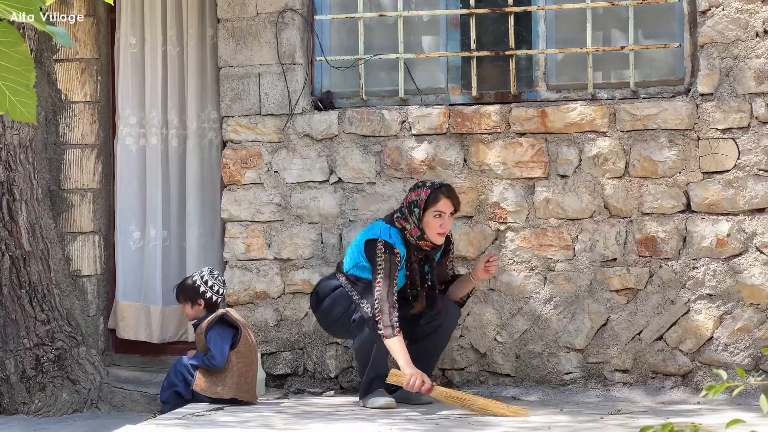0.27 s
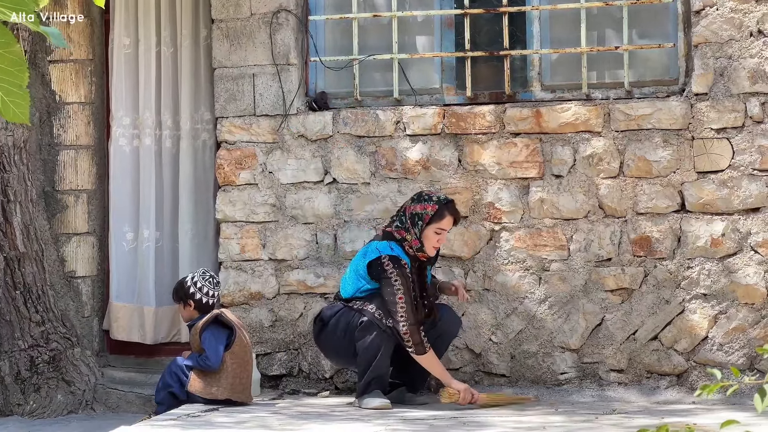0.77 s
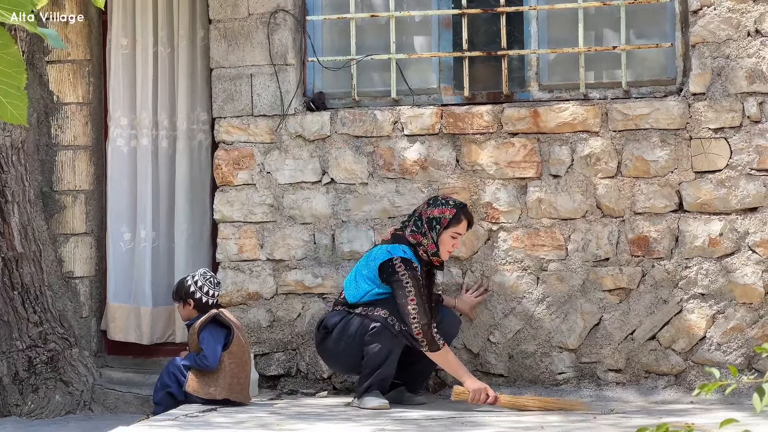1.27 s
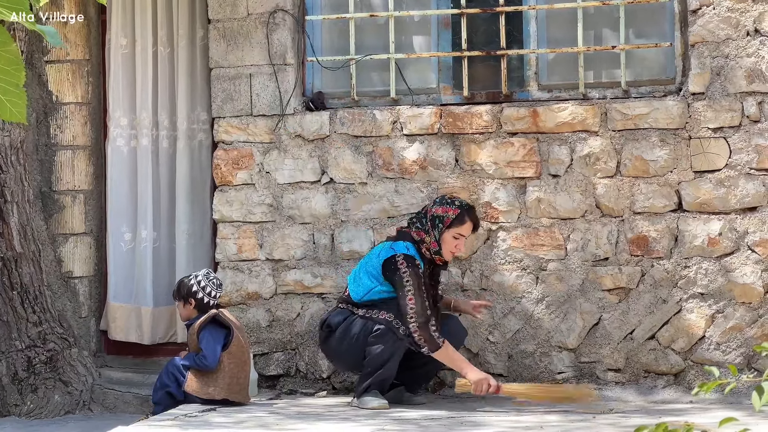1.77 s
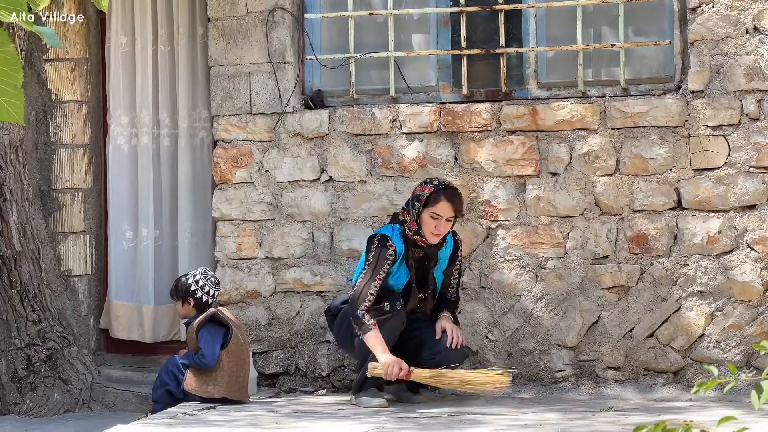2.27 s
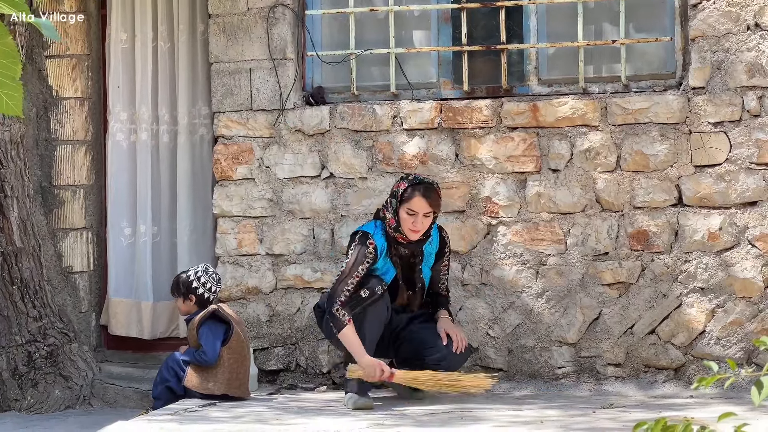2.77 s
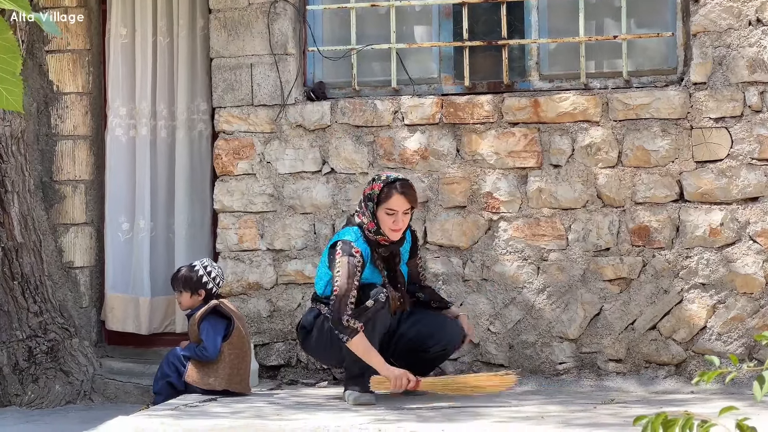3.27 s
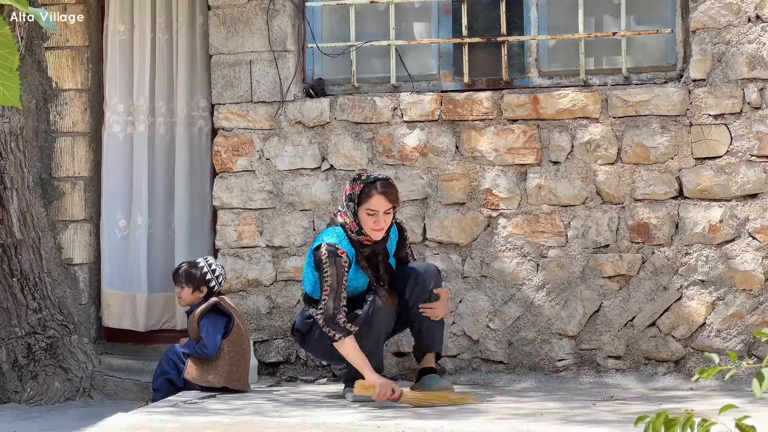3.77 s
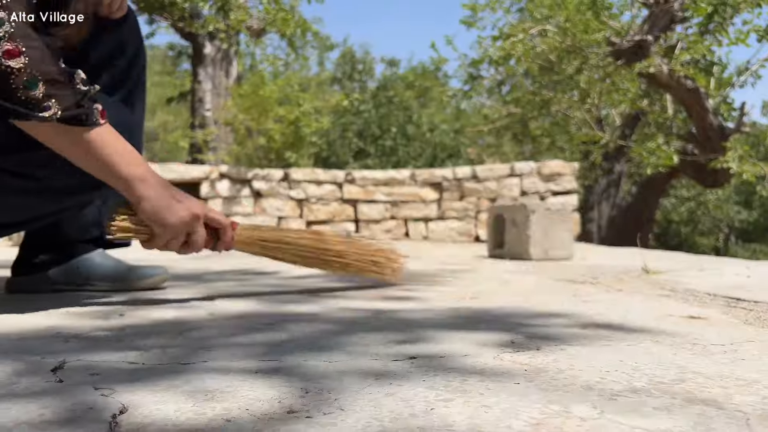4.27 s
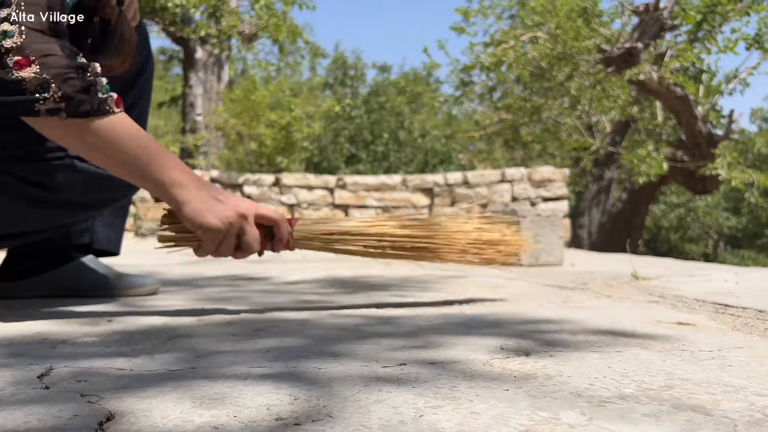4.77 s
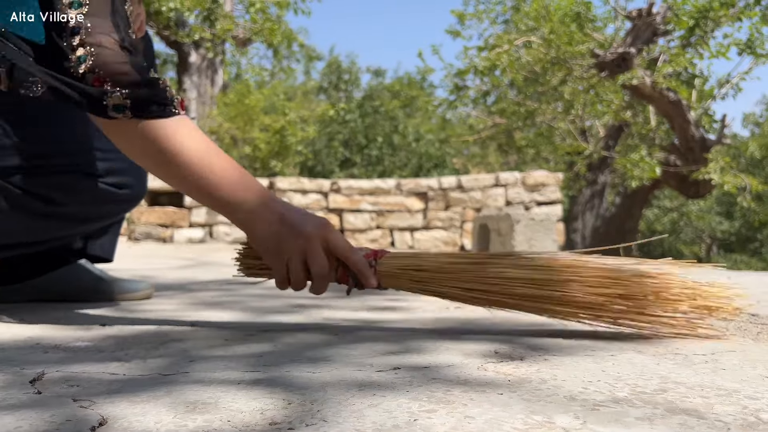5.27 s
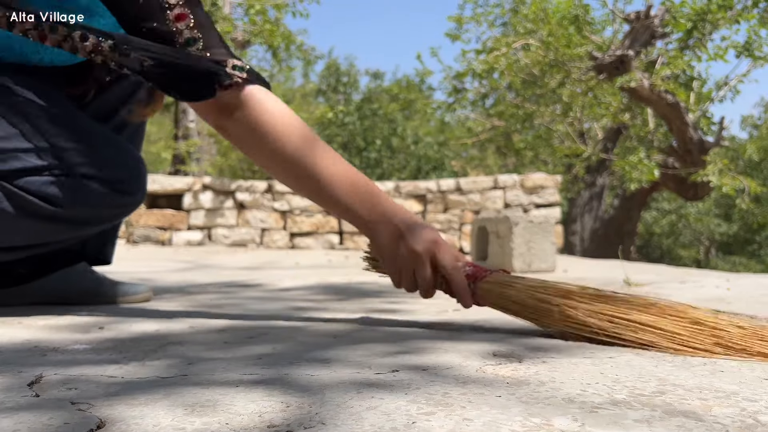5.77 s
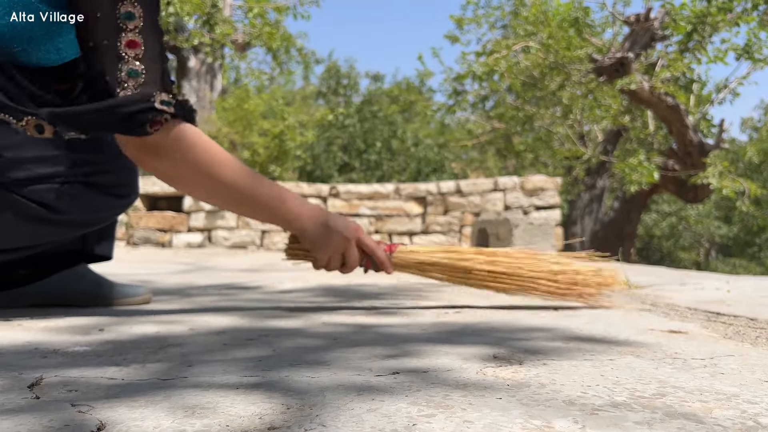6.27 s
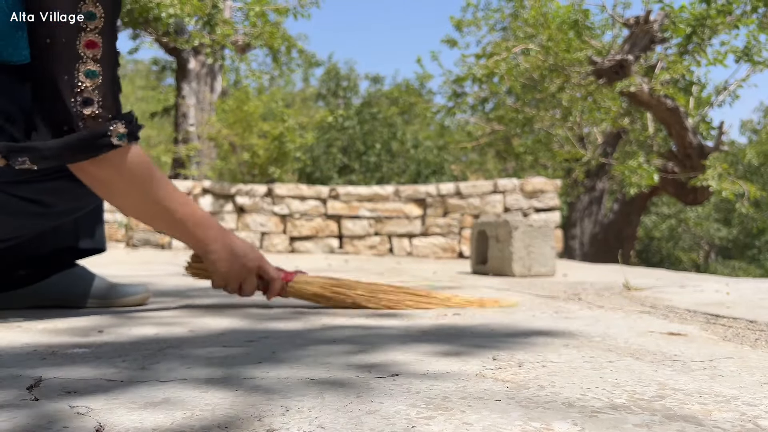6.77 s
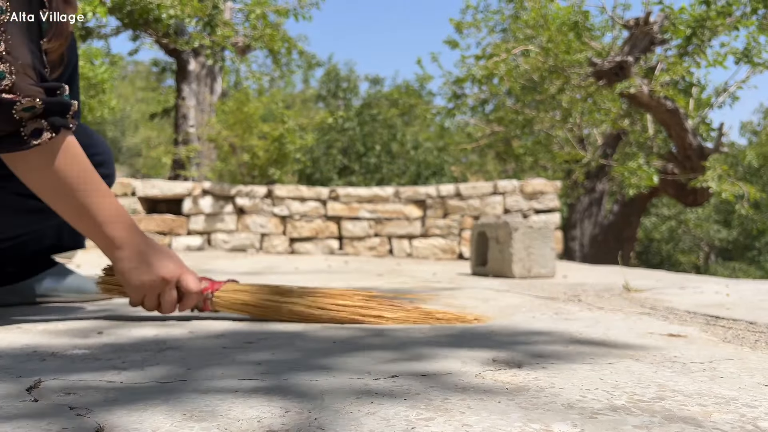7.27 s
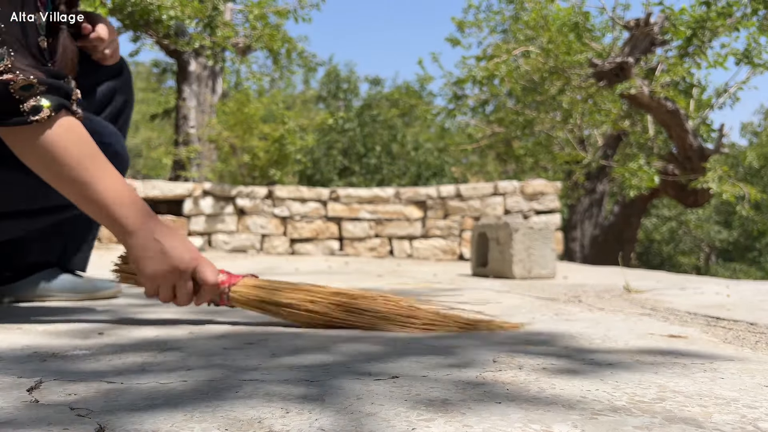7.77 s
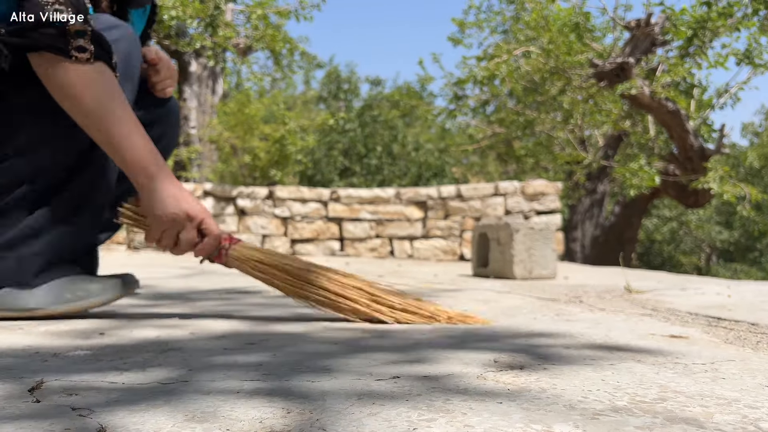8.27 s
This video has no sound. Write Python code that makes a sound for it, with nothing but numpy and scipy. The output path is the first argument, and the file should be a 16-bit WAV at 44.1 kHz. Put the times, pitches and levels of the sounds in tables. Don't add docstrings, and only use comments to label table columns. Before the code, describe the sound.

Dry, even broom swishes on an outdoor concrete yard, distant over a low engine thrum and wind, then suddenly near, crisp and much louder.

```python
import sys
import numpy as np
from scipy import signal
from scipy.fft import rfft, irfft, next_fast_len
from scipy.io import wavfile
from scipy.ndimage import uniform_filter1d

SR = 44100
rng = np.random.default_rng(int(sys.argv[2]) if len(sys.argv) > 2 else 0)


def undo_db(level):
    steps = np.asarray(level, float) / 20
    return 10 ** steps


def inscribe(sig):
    pcm = np.round(np.clip(np.atleast_2d(sig).T, -1, 1) * 32767)
    wavfile.write(sys.argv[1], SR, pcm.astype(np.int16))


N = 374850
HZ, T = np.fft.rfftfreq(512, 1 / SR), np.arange(N) / SR
FAR, NEAR = slice(0, N // 2), slice(N // 2 - SR // 5, N)
CUT_OUT_S, CUT_IN_S = 4.082, 4.127


def evened(x):
    return x / np.sqrt(np.mean(x ** 2) + 1e-20)


def read(points, hz):
    f, value = np.transpose(points)
    return np.interp(np.log(hz + 1), np.log(f + 1), value)


def follow(curve, t):
    return np.interp(t, *np.transpose(curve))


def band(x, lo_hz, hi_hz):
    sections = signal.butter(2, [lo_hz, min(hi_hz, .49 * SR)], "band", fs=SR, output="sos")
    return signal.sosfilt(sections, x)


def add(mix, s, sound):
    part = mix[:, round(s * SR):][:, :sound.shape[-1]]
    part += sound[..., :part.shape[1]]


def hold(t, start, length, edge):
    return np.clip(np.minimum(t - start, start + length + edge - t) / edge, 0, 1) ** 2


def bumps(t, rows):
    return [(np.exp(-((t - s) / half) ** 2), db) for s, half, db in rows]


# pitch_hz, right_lead (half turns)
HOUSING_TURNS = [(8700, 0), (10050, 1), (12050, 2), (13650, 3), (15600, 4)]


def ports(a, b, colour, same, lag=((0, 0),), left=((1, 0),), patchy_db=0.):
    _, t, za = signal.stft(a, SR, nperseg=512)
    zb = signal.stft(b, SR, nperseg=512)[2]
    patches = uniform_filter1d(rng.standard_normal(za.shape), size=4, axis=0)
    patches = evened(uniform_filter1d(patches, size=15, axis=1))
    likeness = np.clip(read(same, HZ), 0, 1)[:, None]
    housing = np.pi * follow(HOUSING_TURNS, HZ)[:, None]
    path = 2 * np.pi * np.outer(HZ * (HZ < HOUSING_TURNS[0][0]), follow(lag, t))
    tilt = undo_db(read(left, HZ) / 2)[:, None]
    shared = likeness * za * np.exp(1j * (housing - path))
    own = np.sqrt(1 - likeness ** 2) * zb
    z = np.array([za * tilt, (shared + own) / tilt])
    z *= undo_db(read(colour, HZ)[:, None] + patchy_db * patches)
    return evened(signal.istft(z, nperseg=512)[1][:, :len(a)])


# pitch_hz, level_db
FAR_AIR = [(60, -40), (170, -5), (280, -3), (550, -20), (1000, -24), (2000, -29), (3500, -39), (8000, -41),
           (12000, -42), (16000, -56)]
NEAR_AIR = [(30, -40), (130, 1), (400, -5), (1200, -11), (3000, -15), (7000, -16), (12000, -28),
            (16000, -32)]
# centre_s, half_length_s, level_db re the floor
FAR_SWELLS = [
    (.03, .08, 5),
    (.56, .11, 9),
    (1.9, .06, 10),
    (2.3, .1, -10),
    (1.48, .08, -4),
    (2.83, .05, 4),
    (3.3, .1, 2),
]
NEAR_SWELLS = [
    (4.42, .04, 4),
    (4.58, .12, 11),
    (5.2, .06, -3),
    (5.9, .1, 6),
    (6.22, .08, -7),
    (7.28, .1, 4),
    (8.35, .2, 3),
]
# time_s, level_db
FAR_LEAVES = [(0, 5), (.4, 1.5), (1.6, 3), (2.2, 0), (4.1, 0)]
NEAR_LEAVES = [(4.1, -1), (5.7, 1.5), (6.7, -.5), (7.6, 3), (8.5, 3)]


def air(view, colour, db, same, treble_same, swells, leaves, lowest_hz):
    t = T[view]
    likeness = [(100, same), (2000, same), (4000, treble_same), (8500, treble_same), (9600, .95)]
    x = ports(*rng.standard_normal((2, len(t))), colour, likeness, patchy_db=2.2)
    ms = t[::44]
    swell_db = sum(bell * up_db for bell, up_db in bumps(ms, swells))
    low = signal.lfilter(*signal.butter(1, [lowest_hz, 2000], "band", fs=SR), x)
    high = signal.lfilter(*signal.butter(1, 2500, "high", fs=SR), x)
    rustle = undo_db(follow(leaves, t))
    return undo_db(db) * (x + high * (rustle - 1) + low * np.interp(t, ms, undo_db(swell_db) - 1))


# pitch_hz, level_db
GUST = [(8, -50), (25, -17), (42, -3), (58, 1), (78, -4), (100, -18), (150, -30), (300, -50), (900, -100)]
# centre_s, half_length_s, level_db
PUFFS = [(0, .15, -54), (.6, .12, -55), (.86, .07, -51), (1.04, .04, -48), (1.69, .04, -50),
         (2.24, .06, -52), (2.42, .05, -52), (2.79, .07, -48), (3.33, .06, -50), (3.55, .08, -49),
         (3.75, .1, -47), (3.97, .1, -42), (4.36, .06, -61), (4.66, .1, -60), (5.1, .08, -68),
         (5.7, .1, -72), (6.78, .05, -72), (7.35, .06, -72), (7.75, .07, -70), (8.3, .1, -73)]


def wind():
    colour = undo_db(read(GUST, np.fft.rfftfreq(N, 1 / SR)))
    a, b = (evened(irfft(rfft(v) * colour, N)) for v in rng.standard_normal((2, N)))
    is_far = T < CUT_IN_S
    side = np.where(is_far, .2, 1.6)
    breeze_db = np.where(is_far, -61, -84)
    ms = T[::44]
    puffs = np.interp(T, ms, sum(bell * undo_db(db) for bell, db in bumps(ms, PUFFS)))
    return (undo_db(breeze_db) + puffs) * np.array([a + side * b, a - side * b])


# time_s, firings_so_far
FIRINGS = [(-.02, -7.5), (.649, 0), (1.23, 7), (1.403, 9), (2.649, 23), (3.991, 38), (4.2, 40.3)]
# pitch_hz, width_hz, level_db
EXHAUST = [(116, 18, 0), (232, 50, -20)]
# time_s, level_db
ENGINE_LEVEL = [(0, -59), (.8, -58), (1.25, -63), (1.5, -58), (4.1, -59)]


def engine():
    count = np.floor(follow(FIRINGS, T + .022))
    strength = undo_db(1.5 * rng.standard_normal(64))[count.astype(int) % 64]
    pulses = np.diff(count, prepend=count[0]) * strength
    t = T[:SR // 4]
    rise = 1 - np.exp(-t / 0.021)
    pipe = np.zeros(len(t))
    for hz, width, db in EXHAUST:
        pipe += undo_db(db) * np.exp(-np.pi * width * t) * np.sin(2 * np.pi * hz * t)
    thud = signal.oaconvolve(pulses, pipe * rise)[:N]
    return undo_db(follow(ENGINE_LEVEL, T)) * thud / np.std(thud[:4 * SR])


def ticks(per_s, spread_db, size):
    strength = undo_db(spread_db * np.minimum(rng.exponential(1, size), 4)) * rng.choice([-1, 1], size)
    return strength * (rng.random(size) < per_s / SR)


# touch_s, push_s (to full pressure), drag_s, scrape_db, landing_db (leading straws)
FAR_STROKES = [
    (0.098, 0.103, 0.112, -45.7, -62.3),
    (0.645, 0.153, 0.115, -44.7, -56.7),
    (1.132, 0.122, 0.075, -45.1, -70.1),
    (1.544, 0.118, 0.071, -45.4, -70.9),
    (1.972, 0.133, 0.072, -44.2, -59.0),
    (2.439, 0.111, 0.091, -44.1, -58.8),
    (2.889, 0.099, 0.09, -43.6, -57.1),
    (3.349, 0.089, 0.076, -45.9, -55.9),
    (3.76, 0.078, 0.048, -42.8, -53.2),
]
NEAR_STROKES = [
    (4.089, 0.079, 0.051, -26.6, -60.0),
    (4.431, 0.154, 0.074, -27.8, -38.5),
    (4.857, 0.176, 0.031, -26.1, -37.4),
    (5.272, 0.152, 0.07, -29.9, -37.3),
    (5.728, 0.125, 0.237, -30.4, -39.4),
    (6.277, 0.166, 0.087, -29.7, -40.1),
    (6.74, 0.139, 0.082, -30.0, -36.3),
    (7.194, 0.179, 0.076, -27.5, -30.1),
    (7.674, 0.168, 0.059, -26.0, -36.4),
    (8.123, 0.191, 0.058, -29.1, -33.9),
]
# start_s, length_s, scrape_db, tips_db re scrape
BRUSHES = [
    (5.139, 0.066, -57.6, -5.5),
    (7.032, 0.097, -41.5, -17.6),
    (7.496, 0.195, -57.2, -19.0),
    (7.983, 0.042, -48.0, -6.3),
    (8.081, 0.069, -44.9, -5.5),
    (8.414, 0.027, -46.3, -6.1),
]
# time_s, level_db
FAR_FACING = [(0, 4.1), (1.8, 2.9), (2.1, 1.4), (4.1, 2.3)]
NEAR_FACING = [(4.1, 3.4), (6.6, 3.4), (8.5, 1.5)]
CONTACT_S, LAND_AT_S, LAND_S = (.01, .012), (.03, .046), (.017, .02)
PUSH_DB, PUSH_BEND, SAG_DB, LIFT_DB_PER_S = (41, 56), (1.99, 2.7), (3.4, 6), (320, 365)
BODY_DB, BODY_DB_PER_S, TIPS_DB_PER_S = (-1.5, .55), (.55, 10.3), (-21, 6.3)
DUST_DB, DUST_DB_PER_S, DUST_LOW_DB = (-18, -11.6), (150, 200), (-7.4, 1.3)
DUST_TIPS_DB, DUST_DULLS_DB_PER_S = (-9.3, -10.1), (130, 113)


def strokes(t, rows, k, facing):
    power = np.zeros((3, len(t)))
    flat = 0 * t
    for touch, push, drag, db, land_db in rows:
        past = t - touch - push
        after = np.maximum(past - drag, 0)
        build_db = -PUSH_DB[k] * np.clip(-past / push, 0, 1) ** PUSH_BEND[k]
        sag_db = -SAG_DB[k] * np.clip(past / drag, 0, 1) ** 2
        bundle = undo_db(db + build_db + sag_db - LIFT_DB_PER_S[k] * after)
        landing = undo_db(land_db) * np.exp(-((t - touch - LAND_AT_S[k]) / LAND_S[k]) ** 2)
        lean = np.clip(past, -push, drag + .1)
        body_db = BODY_DB[k] + BODY_DB_PER_S[k] * lean
        tips_db = TIPS_DB_PER_S[k] * lean + follow(facing, t)
        colour = undo_db(np.array([body_db, flat, tips_db]))
        dust_tips_db = DUST_TIPS_DB[k] - DUST_DULLS_DB_PER_S[k] * after
        dust_db = np.array([DUST_LOW_DB[k] + flat, flat, dust_tips_db])
        dust = (past > 0) * undo_db(db + DUST_DB[k] - DUST_DB_PER_S[k] * after + dust_db)
        contact = np.clip((t - touch) / CONTACT_S[k], 0, 1)
        power += contact ** 2 * ((bundle ** 2 + landing ** 2) * colour ** 2 + dust ** 2)
    for start, length, db, tips_db in BRUSHES:
        lift_db = -300 * np.maximum(t - start - length, 0)
        level_db = db + lift_db + np.array([[4.5], [0], [tips_db]])
        power += (np.clip((t - start) / .012, 0, 1) * undo_db(level_db)) ** 2
    return np.sqrt(power)


# pitch_hz, level_db
FAR_STRAW = [(300, -21), (600, -12), (1000, -4), (2500, -2.5), (4000, -4.5), (5500, -1.5), (8500, 0),
             (11500, -2), (13200, -5.5), (15200, -1.5)]
NEAR_STRAW = [(100, -34), (300, -18), (900, -7), (1700, -5.5), (2500, 3), (3600, 1), (4800, -1), (5900, 3),
              (7000, -3), (7900, 2), (9200, -3), (10500, -4), (11800, 1), (13200, -7), (15500, -4)]
# pitch_hz, likeness (0-1)
FAR_SAME = [(300, 0.94), (900, 0.89), (2200, 0.87), (3100, 0.73), (5000, 0.97), (8400, 0.92), (9200, 1),
            (16000, 1)]
NEAR_SAME = [(100, 0.63), (500, .85), (1400, .65), (2000, .35), (2600, .4), (3200, .68), (4000, .45),
             (7000, .35), (8500, .45), (9700, .94), (16000, .94)]
# pitch_hz, left_minus_right_db
NEAR_LEFT = [(300, -1), (2000, 0.5), (2900, -2), (4000, 8), (5000, -2.5), (6900, 7), (7900, -4.5),
             (9000, -0.5)]
# time_s, right_lag_s
NEAR_LAG = [(5.5, .00015), (5.9, .00006), (6.1, .00015), (7.02, .00015), (7.04, .00028), (7.17, .00028),
            (7.2, .00015)]
# time_s, level_db re scrape
HOLLOW = [(4.1, -22), (6.8, -20), (7.05, -4), (7.5, -10), (8.5, -18)]


def broom(view, rows, k, facing, colour, same, lag, left, hollow):
    t = T[view]
    shared, own = ticks(20000, 1.5, len(t)), ticks(20000, 1.7, len(t))
    straw = ports(shared, own, colour, same, lag - np.array([t[0], 0]), left, patchy_db=2.2)
    size = next_fast_len(len(t))
    spectrum, hz = rfft(straw, size), np.fft.rfftfreq(size, 1 / SR)
    low = 1 / (1 + (hz / 1700) ** 4)
    high = 1 / (1 + (8800 / (hz + 1)) ** 24)
    ring = 1 / (1 + ((hz - 1160) / 90) ** 2)
    shares = (low, 1 - low - high, high, ring)
    layers = [irfft(spectrum * share, size)[:, :len(t)] for share in shares]
    ms = t[::44]
    body, scrape, tips = strokes(ms, rows, k, facing)
    gains = [body, scrape, tips, scrape * undo_db(9 + follow(hollow, ms))]
    flutter = evened(band(rng.standard_normal(len(t)), 29.9, 200))
    sound = sum(x * np.interp(t, ms, gain) for x, gain in zip(layers, gains))
    return sound * undo_db(.95 * flutter) / np.std(layers[1])


# start_s, peak_db, pitch_hz, ring_s
KNOCKS = [(.527, -40, 57, .08), (1.024, -34, 67, .1), (1.027, -40, 4700, .008), (1.027, -50, 3600, .008),
          (1.028, -54, 2500, .012), (2.764, -45, 140, .05), (4.02, -50, 250, .04), (4.0395, -32, 480, .022),
          (4.04, -41, 1500, .012), (4.043, -40, 700, .015), (4.778, -44, 95, .05), (5.146, -35, 5000, .006),
          (5.147, -37, 3600, .005), (7.179, -42, 200, .04), (7.617, -54, 500, .03), (8.24, -50, 286, .04)]


def knocks():
    out, t = np.zeros((2, N)), T[:SR // 4]
    for s, db, hz, t60 in KNOCKS:
        gain = undo_db(db - 60 * t / t60) * (1 - np.exp(-3 * hz * t))
        add(out, s, gain * np.sin(2 * np.pi * hz * t))
    return out


# start_s, length_s, pitch_hz, level_db
SQUEAKS = [
    (.53, .1, 985, -79),
    (.95, .24, 997, -74),
]
# multiple, level_db
SQUEAK_ORDERS = [(1, 0), (2, -5), (3, -12)]


def squeak():
    t, out = T[:3 * SR // 2], np.zeros(N)
    throb = undo_db(3.1 * evened(band(rng.standard_normal(len(t)), 15, 60)))
    for start, length, hz, db in SQUEAKS:
        tone = sum(undo_db(d) * np.sin(2 * np.pi * k * hz * t) for k, d in SQUEAK_ORDERS)
        out[:len(t)] += tone * throb * undo_db(db) * hold(t, start, length, edge=.03)
    return out


# start_s, peak_db, low_part_db re peak, ring_s
SCUFFS = [(0.9544, -50, -13, 0.071), (1.1613, -50, -11, 0.099), (2.385, -58, -0.5, 0.11),
          (2.763, -52, -13, 0.14), (3.196, -49, -9.5, 0.16), (3.292, -59.5, -12, 0.083),
          (3.5644, -52, 5, 0.08), (4.0627, -63, 8, 0.12), (4.2916, -50, 5, 0.06), (5.143, -48, -12, .05),
          (5.618, -57, -20, .06), (6.622, -50, -15, .06), (7.6194, -61, -11, 0.09)]


def scuffs():
    out, t = np.zeros((2, N)), T[:SR // 5]
    size = len(t) * len(SCUFFS)
    colour = [(500, 0), (3000, 2), (16000, -9)]
    grit = ports(ticks(9000, 2., size), ticks(8000, 2., size), colour, FAR_SAME)
    low = evened(band(grit, 500, 2160)).reshape(2, -1, len(t))
    high = evened(band(grit, 2000, 16000)).reshape(2, -1, len(t))
    rise = 1 - np.exp(-t / .003)
    for k, (s, db, low_db, t60) in enumerate(SCUFFS):
        burst = high[:, k] + undo_db(low_db) * low[:, k]
        add(out, s, burst * undo_db(db - 60 * t / t60) * rise)
    return out


def scene():
    far = scuffs() + knocks() + wind()
    near = far.copy()
    far += engine() + squeak()
    far[:, FAR] += broom(FAR, FAR_STROKES, 0, FAR_FACING, FAR_STRAW, FAR_SAME,
                         lag=((0, 0),), left=((1, 0),), hollow=((0, -60),))
    far[:, FAR] += air(FAR, FAR_AIR, -67, .4, .93, FAR_SWELLS, FAR_LEAVES, lowest_hz=600)
    near[:, NEAR] += broom(NEAR, NEAR_STROKES, 1, NEAR_FACING, NEAR_STRAW, NEAR_SAME,
                           NEAR_LAG, NEAR_LEFT, HOLLOW)
    near[:, NEAR] += air(NEAR, NEAR_AIR, -62, .1, .05, NEAR_SWELLS, NEAR_LEAVES, lowest_hz=120)
    fade_out = np.clip((CUT_OUT_S - T) / .001, 0, 1)
    fade_in = np.clip((T - CUT_IN_S) / 0.012, 0, 1)
    return far * fade_out + near * fade_in


def joint(x, under_db, faint_db):
    z = signal.stft(np.array([x[0] + x[1], x[0] - x[1]]) / 2, nperseg=2048)[2]
    power = abs(z[:, :1024]).reshape(2, 64, 16, -1) ** 2
    power = uniform_filter1d(power.mean(2), size=3, axis=2)
    keep = power > power[::-1] * undo_db(-2 * under_db)
    faintest = undo_db(2 * faint_db + .8 * np.arange(37))[:, None]
    keep[:, 27:] &= power[:, 27:] > faintest
    keep[:, :5] = True
    z[:, :1024] *= np.repeat(keep, 16, axis=1)
    mid, side = signal.istft(z, nperseg=2048)[1][:, :N]
    return np.array([mid + side, mid - side])


def band_limit(x):
    return signal.sosfilt(signal.butter(12, 17090, fs=SR, output="sos"), x)


def record(dry):
    edge = signal.firwin(511, 15850, window=("kaiser", 9), fs=SR)
    limited = signal.oaconvolve(dry, edge[None], "same")
    mix = joint(limited, under_db=7.5, faint_db=-113.5)
    return band_limit(mix)


dry = scene()
out = record(dry)
inscribe(out)
```